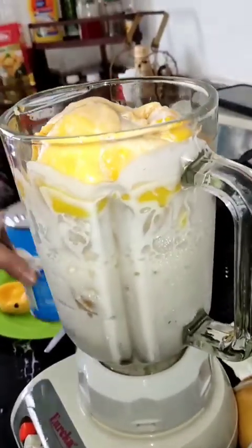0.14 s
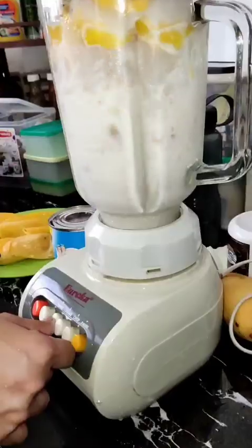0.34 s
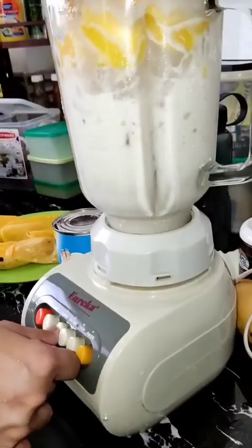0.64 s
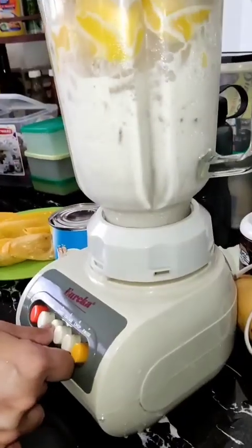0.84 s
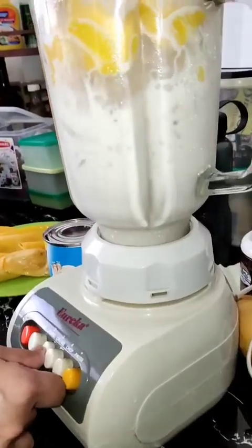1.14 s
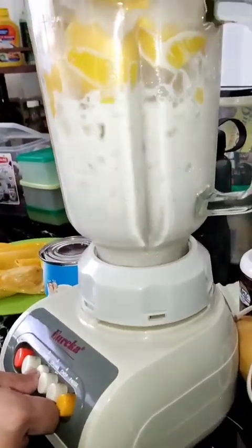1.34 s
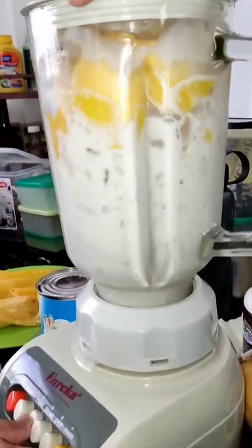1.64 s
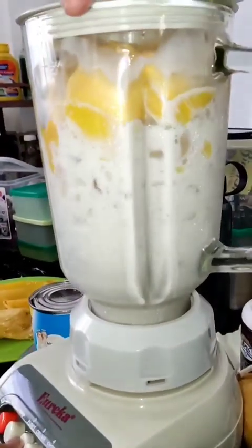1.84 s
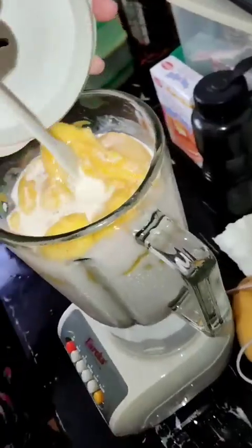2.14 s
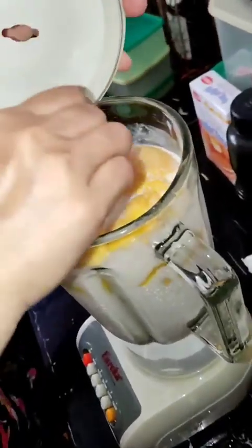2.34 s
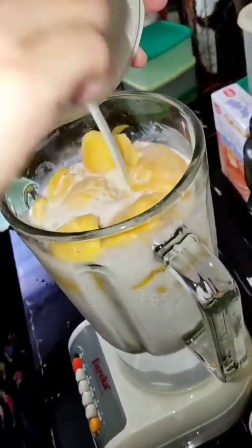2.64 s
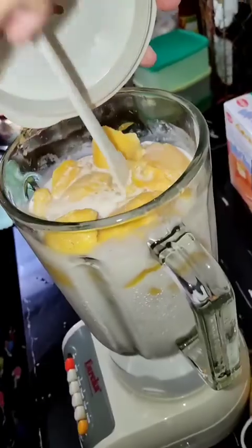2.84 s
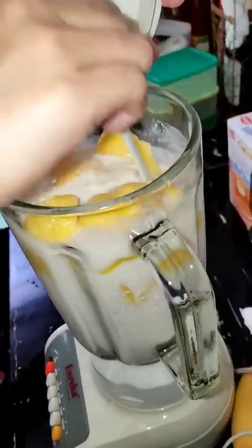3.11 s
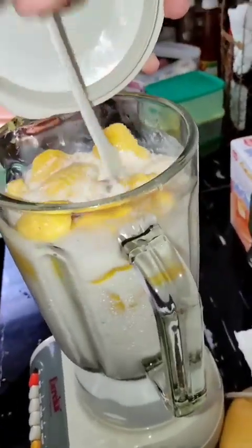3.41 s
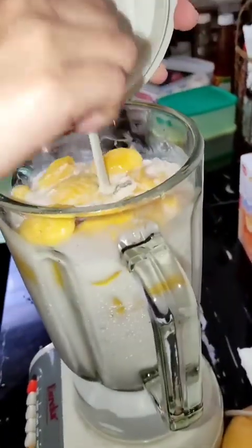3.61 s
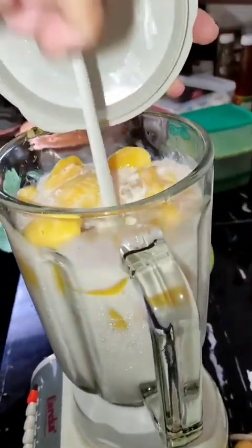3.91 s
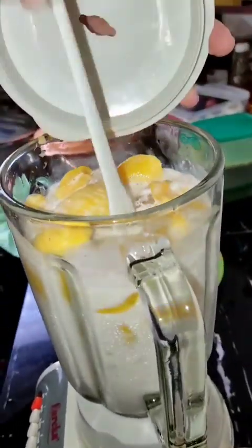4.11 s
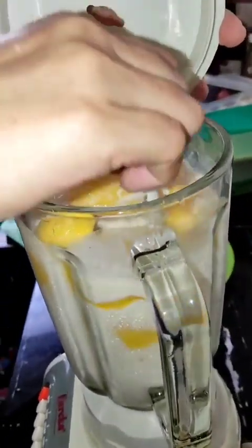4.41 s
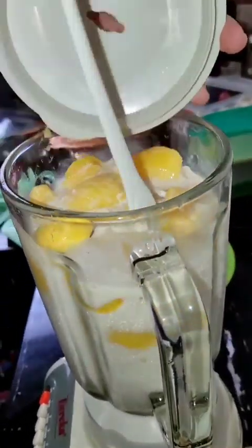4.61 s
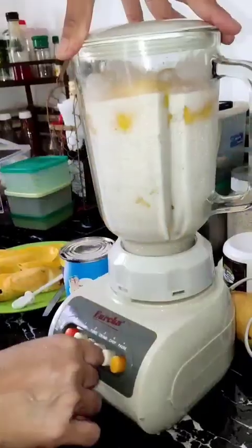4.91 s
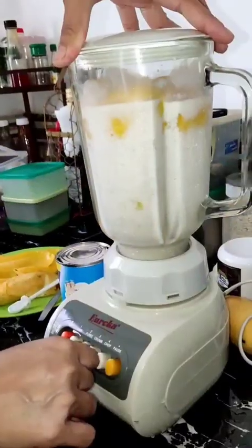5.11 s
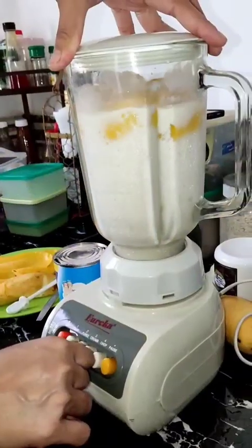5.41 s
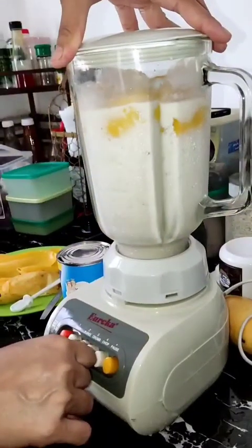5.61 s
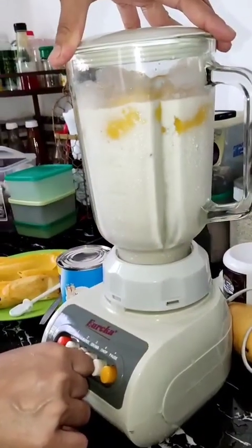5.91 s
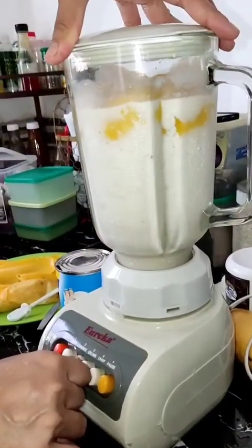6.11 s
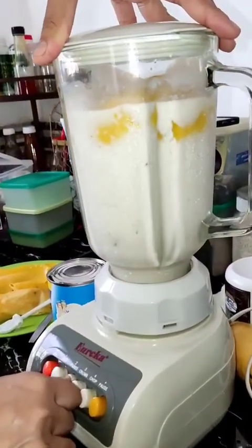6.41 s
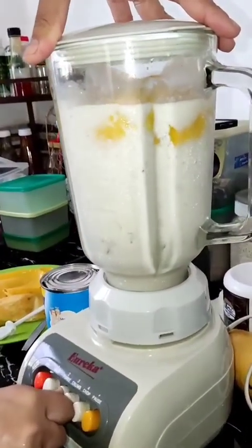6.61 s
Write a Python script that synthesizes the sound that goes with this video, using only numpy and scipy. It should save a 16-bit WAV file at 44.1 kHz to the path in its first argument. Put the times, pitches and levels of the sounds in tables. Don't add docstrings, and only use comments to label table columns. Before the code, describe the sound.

From 0 to 0.4 s there is only soft kitchen air hiss and a faint low fan hum, then a very short silence. At about 0.45 s a blender bursts in close, swelling quickly: a buzzing motor growl, rattling jar and broad, harsh hiss, roughened by ice flung at the glass and lurching as the blades catch lumps, until 2.05 s. A hard cut returns the quiet room, with a plastic paddle working through crushed ice: crunchy strokes around 2.4, 2.6, 2.8, 3.2, 3.6, 4.05, 4.4 and 4.9 s, dry and gritty or wet and slushy, with dull knocks and short bright glass ticks, sharpest near 2.6, 3.2 and 3.6 s. Small gaps separate the pushes. At 4.9 s another hard cut brings a second blender burst, faster and somewhat smoother, with a throbbing hiss, slightly wavering to the end at full level. Close stereo phone pickup, treble thinned.

```python
import sys
import numpy as np
from scipy import signal
from scipy.fft import rfft, irfft
from scipy.io import wavfile
from scipy.ndimage import uniform_filter1d, minimum_filter1d

SR = 44100
rng = np.random.default_rng(int(sys.argv[2]) if len(sys.argv) > 2 else 0)


def makeup_ratio(level_db):
    decades = np.asarray(level_db, float) / 20
    return 10 ** decades


def unload_wav(signal):
    wavfile.write(
        sys.argv[1],
        SR,
        np.round(np.clip(np.atleast_2d(signal).T, -1, 1) * 32767).astype(np.int16),
    )


N = 297675
T = np.arange(N) / SR
HZ = np.fft.rfftfreq(N, 1 / SR)


def evened(x):
    return x / np.sqrt(np.mean(abs(x) ** 2) + 1e-20)


def read(points, hz):
    f, value = np.transpose(points)
    return np.interp(np.log(hz + 1), np.log(f + 1), value)


def humps(modes):
    return sum(db / (1 + (2 * (HZ - f) / width) ** 2) for f, width, db in modes)


def drift(per_s):
    smooth = uniform_filter1d(rng.standard_normal(N), 64)
    return evened(signal.lfilter([1], [1, -np.exp(-2 * np.pi * per_s / SR)], smooth))


def grains(per_s, spread_db, size):
    sizes = makeup_ratio(spread_db * np.minimum(rng.exponential(1, N), 4))
    hits = sizes * (rng.random(N) < per_s / SR)
    decay = np.exp(-np.arange(6 * size) / size)
    return evened(signal.oaconvolve(hits, decay)[:N])


def ports(envelope, pair):
    # (frequency [Hz], likeness [0-1])
    likeness = [(60, .8), (500, .86), (800, .72), (1200, .58), (1900, .35), (2300, .45), (2700, .28),
                (8000, .28), (9300, .4), (10500, .15)]
    # (frequency [Hz], width [Hz], level [dB])
    cavities = [(11200, 5900, 7.5), (8740, 1400, 15)]
    balance, lag = pair
    shared, other = rfft(envelope * rng.standard_normal((2, N)))
    same = read(likeness, HZ)
    late = np.exp(-2j * np.pi * HZ * lag / SR * (HZ < 2100))
    tilt = makeup_ratio((read(balance, HZ) + humps(cavities[:1]) - humps(cavities[1:])) / 2)
    left = shared * tilt * late
    right = (same * shared + np.sqrt(1 - same ** 2) * other) / tilt
    return irfft(np.array([left, right]) / np.sqrt((tilt ** 2 + tilt ** -2) / 2), N)


def colour(x, shape_db, rows, bands, patchy_db):
    gain = makeup_ratio(shape_db)
    hz, t, z = signal.stft(irfft(rfft(x) * gain, N), SR, nperseg=512, noverlap=256)
    patches = uniform_filter1d(rng.standard_normal(z.shape[1:]), size=6, axis=0)
    patches = evened(uniform_filter1d(patches, size=10, axis=1))
    s, *levels = np.transpose(rows)
    share = [10 * np.log10((gain[(HZ > lo) & (HZ < hi)] ** 2).sum() / len(HZ)) for lo, hi in bands]
    wanted = np.array([np.interp(t, s, curve) - d for curve, d in zip(levels, share)])
    corners = np.log(np.ravel([(lo * 1.2, hi / 1.2) for lo, hi in bands]))
    blend = np.array([np.interp(np.log(hz + 1), corners, np.repeat(row, 2)) for row in np.eye(len(bands))])
    z = z * makeup_ratio(blend.T @ wanted + patchy_db * patches)
    return signal.istft(z, SR, nperseg=512, noverlap=256)[1][:, :N]


def between(t0, t1, fade=0.0028):
    return np.clip(np.minimum(T - t0, t1 - T) / fade, 0, 1)


def kitchen():
    # (frequency [Hz], level [dB per Hz])
    rumble = [(15, -31), (30, -20), (85, -22), (135, -28), (175, -32)]
    # (frequency [Hz], level [dB per Hz])
    hiss_shape = [(261, -35), (358, -32.5), (434, -31.5), (720, -29.5), (1890, -28), (3060, -27),
                  (3800, -26.5), (6940, -30.5), (9270, -26.5), (14300, -35)]
    # (first shot level [dB], stirring shot level [dB])
    hiss_db = [-40.5, -40.5]
    # (frequency [Hz], waver [share], level [dB])
    fan = [(57.5, .009, -46.5), (119.4, .004, -56), (147.7, .004, -57), (221, .008, -67), (295, .008, -64),
           (357, .012, -55.5), (441, .006, -64), (525, .006, -61)]
    # (first shot level [dB], stirring shot level [dB])
    fan_db = [-3.5, -2.5]
    # ((frequency [Hz], left-right level [dB]), lag of left [samples])
    around = ([(60, 1), (500, 0.4), (5000, 0.8), (14000, 1)], 0.)
    rows = [(0, hiss_db[0]), (1, hiss_db[0]), (1.5, hiss_db[1]), (7, hiss_db[1])]
    shape = read(rumble + hiss_shape, HZ)
    hiss = colour(evened(ports(1, around)), shape, rows, [(200, 25000)], patchy_db=0.5)
    hum = 0
    for f, waver, db in fan:
        swell = makeup_ratio(db + 2.0 + 0.8 * drift(2.4))
        phase = 2 * np.pi * np.cumsum(f * (1 + waver * drift(1.68))) / SR
        hum = hum + swell * np.sin(phase)
    return hiss + hum * makeup_ratio(np.where(T < 1, *fan_db))


def motor_levels(curve):
    # (time [s], churn [dB], load [dB])
    catches = [(.635, 1.5, -1), (.755, 1, 2), (0.808, -5.5, 0.5), (0.888, 3, 7), (.96, -1.5, 0),
               (0.998, 2.5, 5), (1.04, 0, -4), (1.09, -0.5, -2.5), (1.2, -0.5, -5), (1.335, -2.5, -3.5),
               (1.4, 1, 2), (1.66, -1.5, 0), (1.715, -2.5, 8), (1.77, 0.5, 6), (1.828, -4.5, 12.5),
               (1.935, 1, 5.5), (1.985, -3, 10), (2.05, 1, 6.5), (5.085, 1.5, 8), (5.14, -0.5, -1),
               (5.18, -3.5, 2.5), (5.52, 1, -4.5), (5.83, -2.5, -5), (6.0, 0, -2.5), (6.13, 1.5, -1.5),
               (6.23, -2, 2), (6.26, 0.5, -4), (6.485, -1.5, 1), (6.67, -0.5, 1.5), (6.75, -2, -13)]
    catch_s, spin_up_db_per_s = 0.015, 700
    growl_db, rattle_db, churn_db, hiss_db = -2.5, -1.5, 3, 6.5
    rattle_share = 0.52
    hiss_swing, hiss_muffle = 1.56, 0.02
    t = np.arange(0, 7, .005)
    s, churn, load = np.transpose(curve)
    at, swing, press = np.transpose(catches)
    bump = np.exp(-((t[:, None] - at) / catch_s) ** 2)
    level = np.interp(t, s, churn) - spin_up_db_per_s * np.maximum(s[0] - t, 0).clip(0, .05)
    swing, load = bump @ swing, np.interp(t, s, load)
    growl = level + swing + load + np.sqrt(bump) @ press + growl_db
    rattle = level + swing + rattle_share * load + rattle_db
    hiss = level + hiss_swing * swing - hiss_muffle * load + hiss_db
    return np.transpose([t, growl, rattle, level + swing + churn_db, hiss])


def blender(rows, motor, facing, pair):
    # (time [s], speed [turns per s], throb depth [0-1])
    shaft = [(.45, 120, .15), (.8, 118, .3), (1.0, 100, .2), (2.0, 125, .1), (4.9, 158, .2),
             (5.3, 155, .25), (5.8, 151, .15), (6.05, 162, .2), (6.25, 162.6, .5), (6.42, 163, .45),
             (6.5, 169.2, .55), (6.75, 169.8, .5)]
    # (frequency [Hz], width [Hz], level [dB])
    rings = [(348, 22, 2), (405, 22, 5), (438, 25, 3), (296, 20, 3), (578, 35, 6), (669, 25, 3),
             (1082, 45, 4.5), (2325, 30, 7.5), (2718, 45, 3), (6780, 300, 3), (5088, 60, 3), (5255, 60, 3),
             (5732, 90, 3), (7399, 30, 3)]
    # (frequency [Hz], width [Hz], level [dB])
    glass = (4110, 90, 3)
    pulse_hz = 57.7
    s, turns, depth = np.transpose(shaft)
    angle = 2 * np.pi * np.cumsum(np.interp(T, s, turns)) / SR
    throb = np.exp(1.3 * np.interp(T, s, depth) * (np.cos(angle) + .5 * np.cos(2 * angle)))
    ice = 2.0 + 0.095 * grains(280.0, 10.0, size=50)
    surge = makeup_ratio(1.18 * drift(54.0))
    whirl = evened(ports(ice * surge, pair))
    blade_band = signal.butter(2, [8300, 10400], "band", fs=SR, output="sos")
    top = signal.sosfiltfilt(blade_band, whirl)
    whirl = whirl + top * (evened(throb) - 1)
    beat = 2 * np.pi * pulse_hz * T + 0.32 * drift(2.84)
    shake = evened(ports(np.exp(0.17 * np.cos(beat)) * surge, pair))
    torque = sum(np.cos(k * beat) * makeup_ratio(0.59 * drift(7.6)) for k in range(5, 8))
    low = signal.butter(2, 800, fs=SR, output="sos")
    drive = whirl + signal.sosfiltfilt(low, shake - whirl + 0.052 * torque)
    bands = [(250, 700), (750, 1400), (1500, 5000), (7000, 14000)]
    shape = read(motor, HZ) + humps(rings + facing + [glass])
    return colour(drive, shape, motor_levels(rows), bands, patchy_db=1.5)


def paddle_levels():
    # (bite time [s], lean-in [s], hold [s], force [dB], dryness [dB])
    pushes = [(2.068, 0.011, 0.0095, -42, -10.5), (2.387, 0.11, 0.11, -30, 2.5),
              (2.632, 0.073, 0.018, -39, 1), (2.694, 0.017, 0.046, -38.5, 4),
              (2.821, 0.088, 0.038, -35.5, -2.5), (3.143, 0.018, .02, -45, -8),
              (3.168, .006, .005, -36, -2.5), (3.196, 0.011, 0.052, -31, -2.5),
              (3.293, .02, 0.033, -41, -1.5), (3.419, 0.052, 0.039, -46, -1.5),
              (3.57, 0.075, 0.012, -45, 1), (3.6, 0.018, 0.063, -30.5, -3), (3.682, .02, 0.053, -47, -9),
              (3.85, .01, .005, -53, -2), (4.017, 0.034, .015, -45.5, -3),
              (4.04, 0.0073, 0.094, -33.5, -6.5), (4.24, .012, 0.0086, -47, 5),
              (4.41, 0.0082, 0.12, -33.5, -2.5), (4.499, .02, 0.12, -40, -1),
              (4.651, .004, 0.014, -48.5, 2), (4.702, .03, 0.019, -48, -3.5),
              (4.863, 0.0056, .02, -40.5, -7), (4.886, .012, .05, -34.5, -2.5)]
    lean_db, sag_db_per_s, settle_db_per_s = 20, 55, 248
    slush_db, grit_db, fizz_db, fizz_share = -1.5, 5, 4, 0.26
    t = np.arange(0, 7, .002)
    bite, lean, hold, force, dryness = np.transpose(pushes)
    since = t[:, None] - bite
    lean_in = lean_db * np.minimum(since, 0) / lean
    sag = sag_db_per_s * np.clip(since, 0, hold)
    settle = settle_db_per_s * np.maximum(since - hold, 0)
    level = force + lean_in - sag - settle
    layers = [slush_db - dryness, grit_db, fizz_db + fizz_share * dryness]
    return np.transpose([t] + [10 * np.log10((makeup_ratio(level + db) ** 2).sum(1) + 1e-9) for db in layers])


def stirring():
    # (frequency [Hz], level [dB per Hz])
    slush = [(150, -64), (250, -53), (351, -1.5), (484, -24.5), (603, -4.5), (764, -12), (1050, -4.5),
             (2630, -7.5), (7510, -7.5), (8900, -1), (14300, -11)]
    # ((frequency [Hz], left-right level [dB]), lag of left [samples])
    above = ([(200, 2), (2100, -2.5), (4000, 1), (6000, -3), (14000, -1)], 7)
    crunch = (1.2 + 0.35 * grains(600., 2.7, size=25)) * makeup_ratio(1.7 * drift(43.0))
    bands = [(500, 2000), (2500, 6500), (7000, 14000)]
    return colour(evened(ports(crunch, above)), read(slush, HZ), paddle_levels(), bands, patchy_db=1.8)


def add(mix, at, sound):
    mix[:, at:at + sound.shape[1]] += sound


def strike(out, s, db, pan_db, rings, rise_s):
    t = np.arange(1200) / SR
    blow = sum(makeup_ratio(d - 60 * t / t60) * np.sin(2 * np.pi * f * t) for f, d, t60 in rings)
    crack = makeup_ratio(-1 - 60 * t / 0.0023) * rng.standard_normal(len(t))
    swell = np.minimum(t / rise_s, 1) ** 2
    pan = makeup_ratio([[pan_db / 2], [-pan_db / 2]])
    add(out, round(s * SR) + 20, makeup_ratio(db) * pan * (blow + crack) * swell)


def blows():
    # (time [s], level [dB], frequency [Hz], upper ring level [dB])
    ticks = [(2.0702, -33, 5260, -13), (2.266, -31, 5420, 4), (2.301, -23, 7200, 7),
             (2.309, -26.5, 5500, 17), (2.341, -21, 5760, 7), (2.3616, -14, 5440, 1), (2.397, -21, 5690, 9),
             (2.442, -21, 4470, 8), (2.451, -15, 3900, 7), (2.612, -33, 5440, -13), (2.631, -8.5, 5180, -4),
             (2.693, -25, 6440, -13), (2.803, -14, 5400, -7), (2.826, -22, 5600, 1),
             (2.8825, -12.5, 5500, 3), (3.168, -7, 5000, -4), (3.1927, -20, 3900, 1),
             (3.21, -15, 4600, -16), (3.4281, -34, 5900, -16), (3.5688, -24, 4900, -12),
             (3.608, -8, 4360, -1.5), (4.04, -21, 5100, -3), (4.073, -11, 4360, -19),
             (4.2525, -31, 5270, -9), (3.6007, -23, 4760, 13), (4.4183, -24, 4900, -14),
             (4.501, -17, 6900, -7), (4.655, -25, 5000, -2), (4.8576, -23, 4800, -17),
             (4.8854, -24, 4600, -4), (2.346, -21, 5500, 6), (2.401, -18, 5200, 9), (2.4046, -14, 5530, 6),
             (2.417, -21, 4300, 0), (2.463, -24, 5000, 4), (2.482, -33, 5000, -2), (2.592, -35, 5300, 3),
             (3.204, -22, 6450, -4), (3.24, -28, 5000, -3), (3.587, -21, 5450, -3), (3.623, -21, 4900, 7),
             (3.631, -25, 5100, 11), (3.685, -27, 4970, 9), (3.712, -32, 4530, 5), (3.863, -37, 5000, 7),
             (4.406, -34, 5000, -1)]
    # (time [s], level [dB], frequency [Hz])
    further_ticks = [(2.625, -22, 5000), (2.656, -24, 5440), (2.702, -24, 6000), (2.716, -26, 5500),
                     (4.061, -23, 4500), (4.087, -28, 5000), (4.101, -23, 5600), (4.411, -32, 5000),
                     (4.435, -26, 4500), (4.505, -22, 5460)]
    # (time [s], level [dB], frequency [Hz], left-right level [dB])
    knocks = [(2.327, -32, 1140, -7), (2.365, -18.5, 1190, 2), (2.481, -15, 1240, -1), (2.61, -28, 990, -7),
              (2.63, -23, 1700, -5), (2.811, -25, 1030, 0), (2.813, -17.5, 1570, 2),
              (2.826, -15, 1000, -12), (3.138, -30, 1220, -3.0), (3.191, -9.5, 1430, -5),
              (3.238, -20, 1720, 20), (3.399, -26, 1190, 7), (3.428, -26.5, 2290, -4),
              (3.566, -32, 2120, -7), (3.588, -13, 1010, -2), (3.607, -32, 1130, 1), (3.638, -15, 1080, -3),
              (3.712, -27, 1130, -4), (3.733, -24.5, 1110, 1), (3.861, -30, 1390, 1),
              (4.005, -38, 1550, -1.0), (4.025, -28, 2090, -11), (4.041, -20, 1100, 4),
              (4.071, -30, 1020, 6), (4.141, -17.5, 1040, 8.5), (4.409, -34, 1120, -3.5),
              (4.501, -20.5, 2100, -13), (4.597, -27.5, 1390, -2.0), (4.693, -30, 2130, -7),
              (4.857, -26, 1120, 3), (2.378, -17, 1160, -6), (2.4, -28, 1500, 0), (2.428, -24, 2100, -2),
              (2.443, -16, 1490, -2), (2.463, -18, 1670, -2), (3.203, -12, 1110, 5),
              (3.261, -16.5, 1670, 3), (4.655, -34, 2110, 0), (2.834, -18, 1190, 2), (2.844, -24, 1100, 0),
              (4.087, -22, 1100, 6), (4.1, -19, 1000, 3), (4.42, -21, 1300, -2)]
    glass_t60, lump_t60 = .0045, .008
    tick_pan_db, tick_scatter_db = -12, -3.5
    out = np.zeros((2, N))
    pans_db = tick_pan_db + tick_scatter_db * rng.standard_normal(len(ticks + further_ticks))
    for (s, db, hz, top_db), pan_db in zip(ticks + [(*chip, 0) for chip in further_ticks], pans_db):
        rings = [(hz, -2), (1.42 * hz, -10), (8900, top_db), (9500, top_db - 4.5),
                 (10900, top_db - 14), (12800, top_db - 25)]
        strike(out, s, db + 9.5, pan_db, [(f, d, glass_t60) for f, d in rings], 0.00091)
    for s, db, hz, pan_db in knocks:
        rings = [(hz, 0, lump_t60), (1.43 * hz, -4, lump_t60), (1.8 * hz, -12, lump_t60 / 2)]
        strike(out, s, db + 4.5, pan_db, rings, 0.00067)
    reflections = rng.standard_normal((2, 2000)) * (rng.random((2, 2000)) < .15)
    echo = reflections * makeup_ratio(-60 * np.arange(2000) / SR / .04)
    out = out + makeup_ratio(-17) * signal.oaconvolve(out, echo, axes=1)[:, :N]
    no_bass = signal.butter(2, 400, "high", fs=SR, output="sos")
    return signal.sosfilt(no_bass, out)


def scene():
    cuts = [
        .408,
        .448,
        2.057,
        4.916,
    ]
    # (time [s], churn [dB], load [dB])
    bursts = [
        [(.47, -34.5, -0.5), (.58, -28.5, -0.5), (.73, -21, -2.5), (.85, -25, 0), (1.0, -26, -3.5),
         (1.13, -26, 7), (1.3, -24.5, 3), (1.53, -21.5, -2.5), (1.7, -23, -8.5)],
        [(4.92, -28, 0), (4.96, -24, -1.5), (5.1, -22.5, -7.5), (5.4, -24.5, 0.5), (5.55, -23, 0),
         (5.75, -20.5, -5.5), (5.84, -24, -1.5), (6.1, -23, -4), (6.7, -24, -4.5)],
    ]
    # (frequency [Hz], level [dB per Hz])
    motors = [
        [(15, -56), (25, -16), (97, -27.5), (239, -15), (386, -4), (503, -6.5), (833, -9.5), (1090, -5),
         (1380, -9.5), (2290, -11), (2900, -16), (4940, -16), (7760, -11.5), (9100, -6), (14300, -15)],
        [(15, -65), (25, -22), (97, -32), (123, -20), (227, -31.5), (338, -3), (407, -2), (656, -16.5),
         (903, -13.5), (1580, -15), (2290, -13), (2610, -16), (6280, -17.5), (9100, -11), (14300, -15)],
    ]
    # (frequency [Hz], width [Hz], level [dB])
    facings = [
        [(690, 90, 4), (8950, 350, 8), (10700, 900, 4)],
        [(900, 60, 3), (8960, 200, 4), (9300, 400, 5), (9190, 130, 3.5), (2300, 60, 2)],
    ]
    # ((frequency [Hz], left-right level [dB]), lag of left [samples])
    near = [
        ([(200, 8.5), (2000, 2.5), (4000, 4.5), (7000, 1.5), (14000, 1.5)], 11.7),
        ([(200, 7.5), (2000, 3), (3000, 5), (7000, 1), (14000, 0.5)], 11.3),
    ]
    room = kitchen()
    first, second = (blender(*shot) for shot in zip(bursts, motors, facings, near))
    stir = between(cuts[2], cuts[3])
    mix = room * (between(-1, cuts[0]) + stir)
    mix = mix + first * between(cuts[1], cuts[2])
    mix = mix + (stirring() + blows()) * stir
    return mix + second * between(cuts[3], 7)


def starved(x):
    poor_hz = (3700, 4450, 4450, 5050, 5050, 6350, 6350, 7200, 13500)
    hz, t, z = signal.stft(x, SR, nperseg=2048, noverlap=1536)
    power = abs(z) ** 2
    weak = power < .75 * uniform_filter1d(power, size=24, axis=1)
    frame = power.sum((0, 1))
    steady = frame < 4 * minimum_filter1d(frame, size=5)
    zone = ((hz > 2600) & (hz < 8000) | (hz > 11800))[:, None] & steady
    x = signal.istft(z * np.where(weak & zone, .002, 1), SR, nperseg=2048, noverlap=1536)[1][:, :N]

    hz, fine, z = signal.stft(x, SR, nperseg=1024, noverlap=768)
    loud = np.interp(fine, t, frame) > .002
    bar = np.where(loud, -2.2, -2.7) - .3 * (hz[:, None] > 8000)
    bar = bar + sum(.4 * np.exp(-((hz[:, None] - f) / 110) ** 2) for f in poor_hz)
    luck = rng.standard_normal((len(hz), len(fine) // 4 + 1))
    luck = np.repeat(luck, 4, axis=1)[:, :len(fine)]
    thin = np.repeat(luck[0::4], 4, axis=0)[:len(hz)]
    wide = np.repeat(luck[1::9], 9, axis=0)[:len(hz)]
    lost = minimum_filter1d(np.minimum(thin, wide + .45) - bar, size=5, axis=1) < 0
    zone = ((hz > 2600) & (hz < 8200) | (hz > 11800))[:, None]
    lost &= zone & (np.interp(fine, t, steady) > .9)
    return signal.istft(z * np.where(lost, .002, 1), SR, nperseg=1024, noverlap=768)[1][:, :N]


def unbarred(x):
    # (time [s], level let through [dB])
    sharp = [
        (2.052, -38),
        (2.072, -32),
        (2.631, -33),
        (2.883, -30),
        (3.169, -14),
        (3.193, -22),
        (3.21, -28),
        (3.601, -11),
    ]
    edge = signal.firwin(1201, 14230, window=("kaiser", 9), fs=SR)
    low = signal.oaconvolve(x, edge[None], "same", axes=1)
    slip = sum(makeup_ratio(db) * np.exp(-((T - s - .001) / .002) ** 2) for s, db in sharp)
    return low + (x - low) * slip


def roll_off(x):
    return signal.sosfilt(signal.butter(12, 16900, fs=SR, output="sos"), x)


def record(dry):
    limited = .8 * np.tanh(dry / .8)
    mix = unbarred(starved(limited))
    return roll_off(mix)


dry = scene()
out = record(dry)
unload_wav(out)
```